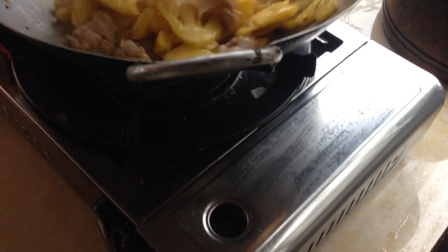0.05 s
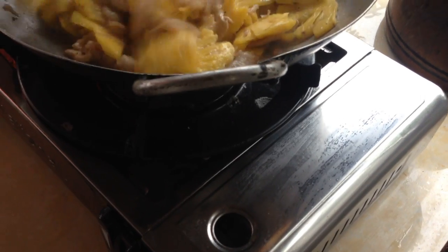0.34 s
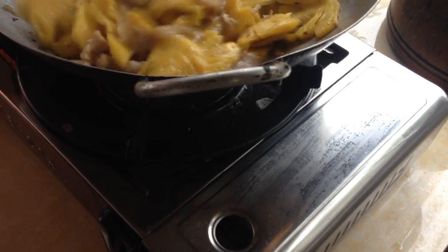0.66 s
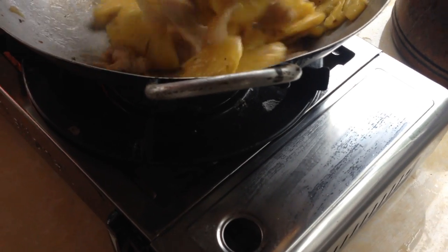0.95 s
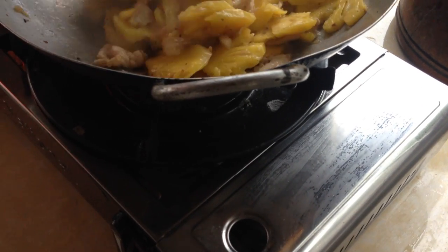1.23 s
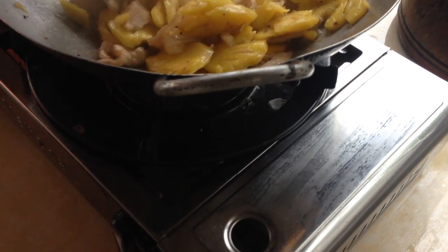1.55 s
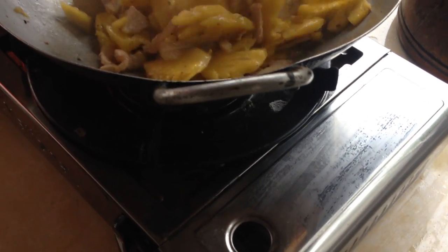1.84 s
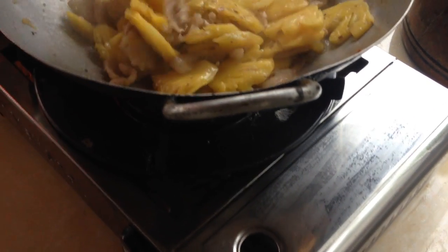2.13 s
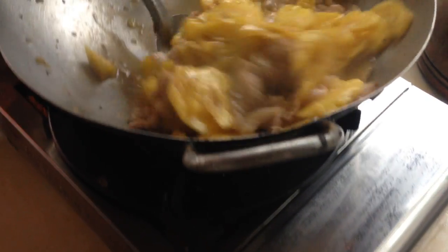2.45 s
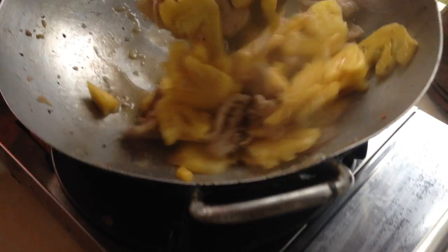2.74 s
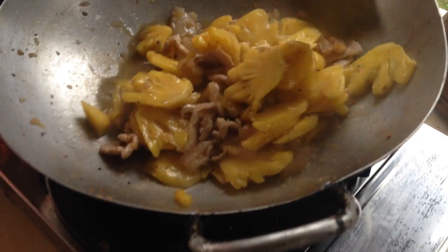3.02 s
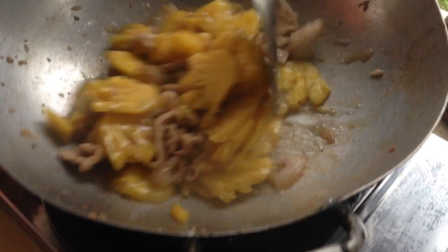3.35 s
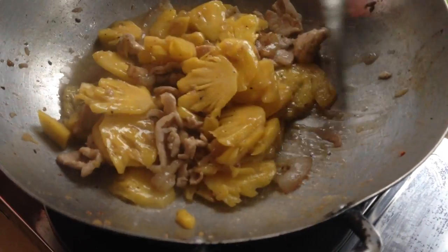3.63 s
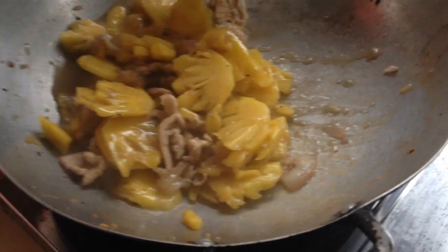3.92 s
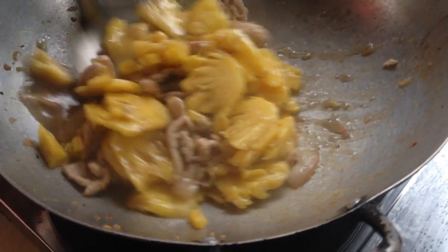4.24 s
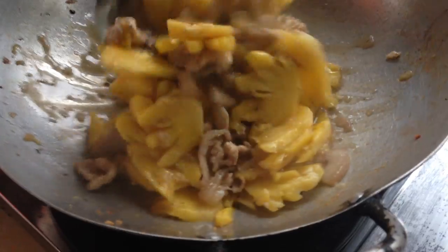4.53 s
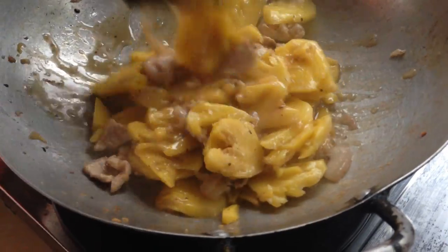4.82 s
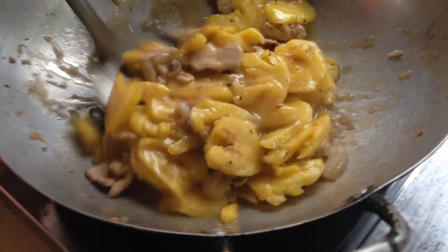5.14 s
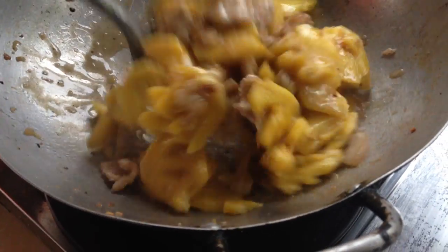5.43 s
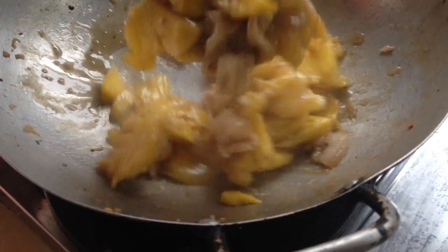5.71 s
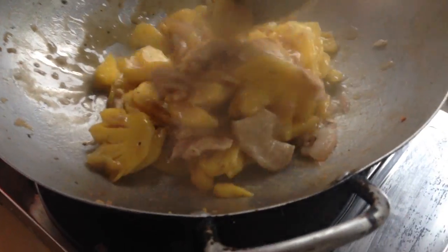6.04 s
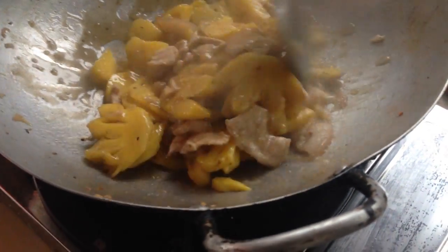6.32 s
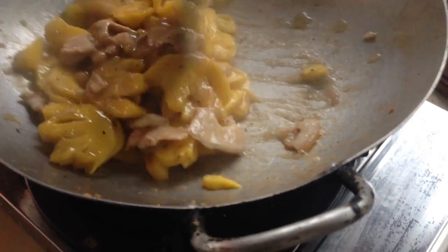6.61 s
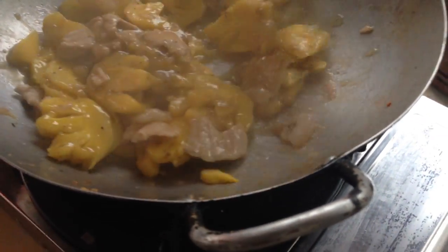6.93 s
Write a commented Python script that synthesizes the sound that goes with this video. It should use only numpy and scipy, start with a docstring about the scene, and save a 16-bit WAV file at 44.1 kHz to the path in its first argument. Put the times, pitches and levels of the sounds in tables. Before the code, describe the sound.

Close up and outdoors, a stir-fry sizzles and spits in a steel wok above a softly rumbling gas burner. A metal spatula clanks against the bowl six times, roughly once a second, each blow bouncing into short scrapes that grow softer, grittier and lower. Two thin, faint squeaks slip in between the strokes. The frying keeps rising and easing, and near the end only light scrapes join it.

```python
"""A sizzle over a low gas rumble: fruit and meat frying in a steel wok on a portable stove, outdoors,
close to one microphone. The sizzle swells whenever wet pieces turn onto hot steel, then sinks back to a
simmer. Six times the metal spatula strikes the wok, bounces and scrapes on under the food, the scrapes
softer, grittier and lower as the blade slides deeper. Two faint falling squeaks come between strokes."""
import sys
import numpy as np
from scipy import signal
from scipy.fft import rfft, irfft, next_fast_len
from scipy.io import wavfile

SR = 44100
rng = np.random.default_rng(int(sys.argv[2]) if len(sys.argv) > 2 else 0)


def wrap_up_sound(samples):
    """Save the sound to the file named by the first command line argument, as 16-bit audio."""
    columns = np.atleast_2d(samples).T
    # keep every value between -1 and 1, then stretch to whole-number steps
    tamed = np.clip(columns, -1, 1)
    steps = np.round(tamed * 32767).astype(np.int16)
    wavfile.write(sys.argv[1], SR, steps)


N = 311770
TIME = np.arange(N) / SR

# broad response of the steel bowl: f/Hz, level/dB
BOWL_RESPONSE = [(100, -20), (250, -16), (350, -4.5), (450, -5.5), (530, 0), (780, -3.5), (1200, 1.5),
                 (1800, 1), (2300, -3), (3000, -4), (4300, 4.5), (5500, 2), (7500, 4), (11000, -2),
                 (15500, -7)]
# modes of wok and blade: f/Hz, level/dB, t60/s
STEEL_MODES = [(520, -7, .14), (575, -9, .14), (635, -7.5, .18), (662, -3, .22), (825, -5, .2),
               (1071, -9, .16), (1177, -5, .2), (1234, -4, .2), (1655, -10, .15), (2012, -4.5, .2),
               (2068, -9, .18), (2305, -11, .12), (2684, -7, .13), (3618, -14, .15), (3977, -10, .15),
               (4152, -9, .21), (4275, -10, .28), (4790, -10, .2), (4965, -6, .22), (5799, -13, .3),
               (6850, -14, .14), (9084, -5, .11)]


def from_db(db):
    """Decibels to gain."""
    return 10 ** (np.asarray(db) / 20)


def rms_one(x):
    """Scale to unit power."""
    return x / np.sqrt(np.mean(x ** 2) + 1e-20)


def at_hz(points, hz):
    """Read a spectrum on a log-frequency axis."""
    known_hz, level = np.transpose(points)
    return np.interp(np.log(hz + 1), np.log(known_hz), level)


def bump(hz, centre, width):
    """Shape of a resonance, 1 on top."""
    return 1 / (1 + (2 * (hz - centre) / width) ** 2)


def decay(t, t60):
    """Exponential fall of 60 dB in t60 seconds."""
    return np.exp(-np.log(1000) * t / t60)


def add(track, start_s, sound):
    """Mix a sound in at a given time."""
    start = max(round(start_s * SR), 0)
    track[start:start + len(sound)] += sound[:N - start]


def coloured(x, db_at):
    """Causal (minimum-phase) filter whose gain in dB is db_at(Hz)."""
    size = 2 * next_fast_len(len(x) // 2 + 1024)
    hz = np.arange(size // 2 + 1) * SR / size
    cepstrum = irfft(np.log(from_db(db_at(hz))))
    cepstrum[1:size // 2] *= 2
    cepstrum[size // 2 + 1:] = 0
    return irfft(rfft(x, size) * np.exp(rfft(cepstrum)))[:len(x)]


def band(x, low_hz, high_hz):
    """Steep band-pass."""
    return signal.sosfilt(signal.butter(4, [low_hz, high_hz], "band", fs=SR, output="sos"), x)


def drift(per_s):
    """A random wander over time, spread about 1."""
    knots = rng.standard_normal(4096)
    return np.interp(TIME * per_s, np.arange(len(knots)), knots)


def grains(size, per_s, spread_db):
    """Random clicks of uneven strength."""
    strength = from_db(spread_db * np.minimum(rng.exponential(1, size), 5))
    return (rng.random(size) < per_s / SR) * strength * rng.choice([-1, 1], size)


def sizzle_swells(spray_weight, simmer_db=-56):
    """Each turn of the food swells the sizzle, which fades back to a simmer as the wet face dries."""
    # wet food meets hot steel: peak t/s, level/dB, rise/s, fade/s, fine spray/dB
    turns = [(0.0, -43, 0.1, 0.35, 1.5), (0.4, -61, 0.14, 0.18, -4), (0.84, -46.5, 0.27, 0.15, -1.5),
             (0.99, -46, 0.13, 0.19, 2), (1.33, -54, 0.11, 0.46, 1), (2.45, -45.5, 0.056, 0.25, -0.5),
             (2.61, -44.5, 0.09, 0.32, 2.5), (3.45, -52, 0.082, 0.11, 0), (4.27, -50.5, 0.08, 0.42, -3),
             (4.47, -60.5, 0.075, 0.3, 9.5), (4.87, -55.5, 0.29, 0.24, 2.5), (5.33, -49, 0.29, 0.13, 0.5),
             (5.63, -54.5, 0.16, 0.82, 2.5), (6.52, -47.5, 0.072, 0.16, 0.5), (6.88, -52, 0.16, 0.36, 1.5)]
    power = from_db(simmer_db) ** 2
    for peak_s, level_db, rise_s, fade_s, spray_db in turns:
        t = TIME - peak_s
        swell = np.exp(-np.where(t < 0, (t / rise_s) ** 2, t / fade_s).clip(0, 20))
        power = power + (from_db(level_db + spray_weight * spray_db) * swell) ** 2
    return np.sqrt(power)


def frying(hiss_gain=0.56, flicker_db=1.23, spit_db=20.0):
    """Countless tiny steam bubbles burst in the oil, with a louder spit now and then."""
    # spectrum of the bursting bubbles: f/Hz, level/dB
    spectrum = [(210, -34), (350, -9), (466, -9), (512, -2), (619, -7.5), (692, -7), (921, -4.5),
                (1050, -4.5), (1230, 0.5), (1550, -3.5), (1820, -2.5), (2500, 1.5), (3280, 4.5),
                (14500, -8), (15500, -12)]
    # resonances of the bowl's hollow: f/Hz, width/Hz, gain/dB
    hollow = [(611, 31, 8), (1347, 57, 3.5), (1840, 73, 8), (1880, 90, -7.5), (2080, 120, 1.5),
              (2621, 170, -9), (2654, 51, 12), (2920, 115, -2.5), (2980, 46, -1), (3300, 33, -15.5),
              (3920, 120, 0), (4250, 34, 4), (4770, 120, 2)]
    hollow_db = lambda hz: sum(db * bump(hz, centre, width) for centre, width, db in hollow)
    bubbles = rms_one(grains(N, per_s=7000, spread_db=2.0))
    fizz = rms_one(bubbles + hiss_gain * rng.standard_normal(N))
    fizz *= from_db(flicker_db * drift(per_s=45))
    spits = from_db(spit_db) * grains(N, per_s=14, spread_db=0.0)
    sizzle = coloured(fizz + spits, lambda hz: at_hz(spectrum, hz) + hollow_db(hz))
    # a fine spray adds to the treble at the cost of the low, wet part
    ranges = [((350, 2500), -1.18, -1.22), ((2500, 7000), 0.0, 0), ((7000, 17000), -4.5, 1)]
    out = np.zeros(N)
    for edges_hz, trim_db, spray_weight in ranges:
        part = band(band(sizzle, *edges_hz)[::-1], *edges_hz)[::-1]   # both ways: no dip between bands
        out += sizzle_swells(spray_weight) * from_db(trim_db) * rms_one(part)
    return out


def burner(rumble_db=2.5, flutter_db=2.0, surge_db=2.5, flutter_share=0.13):
    """The turbulent gas flame rumbles and flutters under the wok, surging at random."""
    # strength of the flame: t/s, rumble level/dB, flutter level/dB
    flame_levels = [(0.0, -54.5, -56), (0.35, -55, -59.5), (0.75, -53, -56), (1.61, -57, -53),
                    (3.13, -52.5, -60), (3.64, -55, -56), (4.35, -52, -53.5), (4.75, -55, -57),
                    (5.04, -51.5, -48.5), (5.38, -60.5, -64.5), (6.71, -55, -60.5), (7.07, -54, -65.5)]
    # spectrum of the flame: f/Hz, level/dB
    spectrum = [(12, -79), (20, -5), (31, -22), (52, -1), (102, 1.5), (155, -4.5), (208, -4), (235, -8),
                (312, -13), (343, -9), (387, -18.5), (461, -22), (500, -15), (650, -45), (1100, -120)]
    times, rumble_curve, flutter_curve = np.transpose(flame_levels)
    surge = surge_db * drift(per_s=9)
    rumble = np.interp(TIME, times, rumble_curve) + rumble_db + surge
    flutter = np.interp(TIME, times, flutter_curve) + flutter_db + flutter_share * surge
    out = np.zeros(N)
    for level_db, edges_hz in [(rumble, (22, 150)), (flutter, (150, 480))]:
        flame = coloured(rng.standard_normal(N), lambda hz: at_hz(spectrum, hz))
        out += from_db(level_db) * rms_one(band(flame, *edges_hz))
    return out


def mode_ripple(step_hz=170, spread_db=3.0):
    """Crowded modes bunch and cancel differently at each striking point: a dB ripple over frequency."""
    knots = rng.standard_normal(256)
    return lambda hz: spread_db * np.interp(hz / step_hz, np.arange(len(knots)), knots)


def impact(t, hard_db, crack_db=6.5, clash_db=2.0, wash_db=-6.5, wash_hz=6000):
    """Blade meets steel: a crack, a short clash and a duller wash of crowded modes."""
    clash, wash = rng.standard_normal((2, len(t)))
    stretch = from_db(-0.25 * hard_db)   # a harder contact is over sooner
    pole = np.exp(-2 * np.pi * wash_hz / SR)
    force = from_db(clash_db) * clash * decay(t, t60=0.028 * stretch) / np.sqrt(stretch)
    force += from_db(wash_db) * signal.lfilter([1 - pole], [1, -pole], wash) * decay(t, t60=0.11)
    force[0] += from_db(crack_db + hard_db)
    return force


def spatula_knocks(pivot_hz=2000, scatter_db=3.5, choke_s=0.13):
    """Each blow of the spatula sounds through the bowl and sets a few clear modes ringing."""
    # blows and bounces: t/s, level/dB, tilt/(dB per octave), contact f/Hz, its boost/dB,
    # hardness/dB, f/Hz of the mode hit best, its boost/dB
    blows = [(0.5304, -12, -1.6, 2350, 9, -2, 2068, 19), (0.5558, -28.5, -7, 1000, 9.5, -4, 1177, 8),
             (0.5662, -23.5, -4.5, 2200, 14, 3, 4275, 16), (0.6325, -24.5, -2.5, 1080, 21.5, -11, 2012, 9),
             (0.7298, -35, -0.5, 3830, 20.5, -9, 4152, 2), (1.3844, -41.5, 2.5, 3900, 7, 14.5, 4152, -2),
             (1.4862, -12.5, -0.5, 4220, -1, -13, 2068, 6), (1.5436, -23.5, -2, 4850, 17.5, -18, 2012, 12),
             (1.5802, -19, -1.5, 4960, 8, 12.5, 2012, 0), (1.615, -25.5, -3, 2000, 10, -13, 2068, -2),
             (1.67, -28.5, -4, 1030, 10, -15, 4275, 16), (2.2612, -12.5, -0.5, 3740, 4, -1, 2012, -0.5),
             (2.2853, -18, -0.5, 2020, -3, -10, 4152, 11), (2.3388, -18.5, -1.5, 2520, 13.5, -4, 4790, 5),
             (2.364, -25.5, -2.5, 2400, 14, 13, 825, 13), (2.415, -28.5, -7.5, 714, 16, 12, 662, 2),
             (2.444, -34, -10, 850, 7, -6, 825, -4), (3.382, -37, -3, 1420, 14, -10, 1234, 14),
             (3.709, -12.5, -4, 635, 21, 6, 635, 6), (4.0821, -12, -0.5, 2727, 25.5, -11, 1177, 10.5),
             (4.0929, -13.5, 0, 9100, 11.5, 7, 9084, 23), (4.1158, -17, -0.5, 5000, 3, -6, 5799, 20.5),
             (4.17, -28.5, -7, 1100, 7, 1, 1071, 21), (4.2852, -33, -9, 800, 3, 13, 2012, 7),
             (4.3413, -37.5, 0, 3700, 18, -10, 4152, 0), (4.377, -32, -4.5, 570, 11, -2, 520, 26),
             (5.0496, -15.5, -0.2, 4000, 13, 15.5, 4152, 8), (5.0581, -19.5, -1.5, 4200, 9, 16, 4152, 27.5),
             (5.0724, -20.5, -1, 2460, 19.5, 13, 1655, 10), (5.1506, -20.5, -3, 2135, 19.5, 6, 2012, 1),
             (5.212, -26.5, -4, 1550, -13, -12, 1655, -4), (5.271, -33, -8.5, 700, 13, -2, 662, -7)]
    # spectrum of a blow of middling hardness: f/Hz, level/dB
    middling_blow = [(750, -3), (2100, 2), (4900, -2.5), (10600, -3.5)]
    # how much of a blow goes into the clear rings: f/Hz, gain/dB
    ring_coupling = [(750, -26.5), (2100, -14), (4900, -16.5), (10600, -27.5)]
    out, t = np.zeros(N), TIME[:SR // 3]
    blow_hz, blow_db = np.transpose(middling_blow)
    mode_hz, mode_db, mode_t60 = np.transpose(STEEL_MODES)
    # the blade sinks into the food, which chokes the rings ever faster
    rings = np.sin(2 * np.pi * mode_hz[:, None] * t) * decay(t + t ** 2 / choke_s, mode_t60[:, None])
    for start_s, level_db, tilt, contact_hz, contact_db, hard_db, ring_hz, ring_db in blows:
        force = impact(t, hard_db)
        blow = np.column_stack([blow_hz, level_db + blow_db + tilt * np.log2(blow_hz / pivot_hz)])
        # how the blade lands favours one range of frequencies
        contact = lambda hz: contact_db * bump(hz, contact_hz, width=0.19 * contact_hz)
        ripple = mode_ripple()
        colour = lambda hz: at_hz(blow, hz) + at_hz(BOWL_RESPONSE, hz) + contact(hz) + ripple(hz)
        add(out, start_s, coloured(force, colour))
        # where it lands decides which mode sings out
        struck_db = at_hz(blow, mode_hz) + at_hz(ring_coupling, mode_hz)
        struck_db += ring_db * bump(mode_hz, ring_hz, width=0.014 * ring_hz)
        gains = from_db(mode_db + struck_db + scatter_db * rng.standard_normal(len(mode_hz)))
        signs = rng.choice([-1, 1], len(mode_hz))
        add(out, start_s, (gains * signs) @ rings)
    return out


def blade_rasp(friction, pitch_hz, width_hz=150):
    """Friction drives the blade's gliding resonances and limits their swing, so the rasp holds on."""
    # resonances of the rubbed blade: ratio to the main one, level/dB
    blade_modes = [(1, 9), (2.25, -16)]
    phase = 2 * np.pi * np.cumsum(pitch_hz) / SR
    rasp = 0
    for ratio, mode_db in blade_modes:
        carrier = np.exp(1j * ratio * phase)
        swing = signal.lfilter([1], [1, -np.exp(-np.pi * width_hz / SR)], friction / carrier)
        limited = swing / np.sqrt(abs(swing) + 1e-9)
        rasp = rasp + from_db(mode_db) * (carrier * limited).real
    return rasp


def spatula_scrapes(pitch_sag=0.07, slip_t60=0.0099, firm_db=-34, grit_hz=4500, low_cut_hz=470):
    """The blade rubs and slips, sagging in pitch as it travels; rasp and grit sound through the bowl."""
    # blade pushed along the steel: t/s, length/s, level/dB, starting f/Hz
    pushes = [(0.53, 0.071, -32, 2370), (0.625, 0.092, -34, 2210), (0.631, 0.071, -36.5, 1095),
              (0.685, 0.15, -42.5, 705), (1.544, 0.028, -21.5, 2156), (1.582, 0.052, -35, 2000),
              (1.647, 0.11, -47, 990), (2.297, 0.021, -30, 2170), (2.335, 0.027, -32, 5000),
              (2.39, 0.018, -37, 2150), (2.417, 0.12, -50.5, 780), (3.715, 0.039, -21, 574),
              (3.744, 0.094, -26.5, 684), (3.746, 0.07, -32.5, 850), (3.772, 0.072, -39.5, 4700),
              (4.071, 0.014, -40, 2720), (4.109, 0.026, -24, 5130), (4.145, 0.055, -29.5, 2370),
              (4.162, 0.065, -36.5, 1150), (4.173, 0.052, -24, 2090), (4.225, 0.24, -61, 2060),
              (4.351, 0.093, -43.5, 550), (5.186, 0.03, -38, 1980), (5.25, 0.13, -49, 750),
              (6.046, 0.14, -59, 2310), (6.599, 0.57, -56, 2250), (6.871, 0.08, -49, 2320),
              (6.874, 0.039, -49.5, 3700)]
    out, t = np.zeros(N), TIME[:SR // 3]
    steel_peaks = lambda hz: np.max([bump(hz, mode[0], width=40) for mode in STEEL_MODES], axis=0)
    bowl = lambda hz: at_hz(BOWL_RESPONSE, hz) + 4.0 * steel_peaks(hz)
    grit_colour = lambda hz: bowl(hz) - 6.0 * np.log10(1 + (hz / grit_hz) ** 2)
    for start_s, length_s, level_db, start_hz in pushes:
        catches = abs(grains(len(t), per_s=380, spread_db=5.0))
        slips = signal.lfilter([1], [1, -decay(1 / SR, slip_t60)], catches)
        travel = np.clip(t / length_s, 0, 1)
        pressure = np.clip(np.minimum(travel / 0.04, (1 - travel) / 0.65), 0, 1)   # bites, then eases
        blade_friction, grit_friction = (1 + rms_one(slips)) * rng.standard_normal((2, len(t)))
        blade = blade_rasp(blade_friction, start_hz * (1 - pitch_sag * travel))
        rasp = rms_one(coloured(pressure * blade, bowl))
        grit_db = -13 + 0.6441 * (firm_db - level_db)   # the lighter the scrape, the more of it is grit
        grit = from_db(grit_db) * rms_one(coloured(pressure * grit_friction, grit_colour))
        add(out, start_s, from_db(level_db) * np.sqrt(np.mean(pressure ** 2)) * (rasp + grit))
    return signal.sosfilt(signal.butter(2, low_cut_hz, "high", fs=SR, output="sos"), out)


def reflections(x, level_db=-15.5, t60=0.099, delay_s=0.008, dull_hz=3000):
    """Nearby walls and floor return a weak, dull tail to the microphone."""
    t = TIME[:SR // 2]
    tail = rng.standard_normal(len(t)) * decay(t, t60) * (t > delay_s)
    tail = coloured(tail, lambda hz: -4.5 * np.log10(1 + (hz / dull_hz) ** 2))
    return from_db(level_db) * signal.fftconvolve(x, tail / np.linalg.norm(tail))[:N]


def squeaks(bend=2.3, waver=0.016, gain_db=3.0, flutter_db=3.5):
    """In each squeak two thin, unsteady harmonics sag in pitch together."""
    # t/s, length/s, fundamental f/Hz at start and at end, third and fourth harmonic level/dB
    glides = [(1.974, 0.23, 829, 666, -52.5, -60), (3.37, 0.15, 780, 767, -57, -54)]
    out = np.zeros(N)
    for start_s, length_s, start_hz, end_hz, *harmonic_db in glides:
        size = int(length_s * SR)
        along = np.linspace(0, 1, size)
        pitch_hz = start_hz + (end_hz - start_hz) * along ** bend
        pitch_hz *= 1 + waver * drift(per_s=350)[:size]
        phase = 2 * np.pi * np.cumsum(pitch_hz) / SR
        tone = from_db(harmonic_db) @ np.sin(np.outer([3, 4], phase))
        envelope = from_db(gain_db + flutter_db * drift(per_s=125)[:size]) * np.sin(np.pi * along)
        add(out, start_s, envelope * tone)
    return out


def scene():
    """Spatula, food and flame close to one microphone."""
    spatula = spatula_knocks() + spatula_scrapes()
    return (spatula + reflections(spatula) + frying() + burner() + squeaks())[None]


def record(dry, ceiling=0.79, cutoff_hz=15500):
    """The hardest peaks are rounded and the top is cut."""
    low_pass = signal.ellip(10, .1, 80, cutoff_hz, fs=SR, output="sos")
    return signal.sosfilt(low_pass, ceiling * np.tanh(dry / ceiling))


dry = scene()
out = record(dry)
wrap_up_sound(out)
```